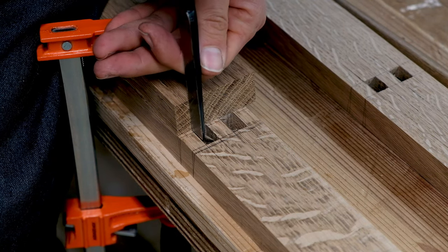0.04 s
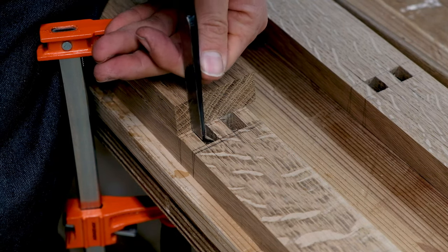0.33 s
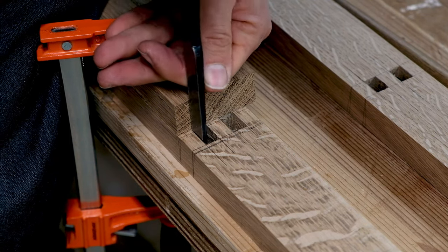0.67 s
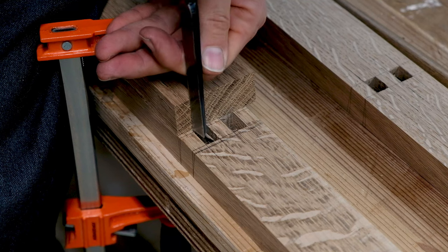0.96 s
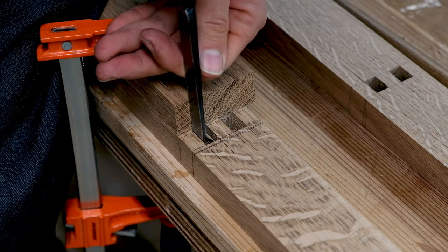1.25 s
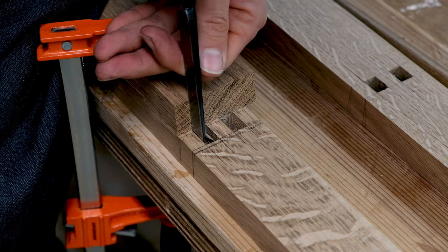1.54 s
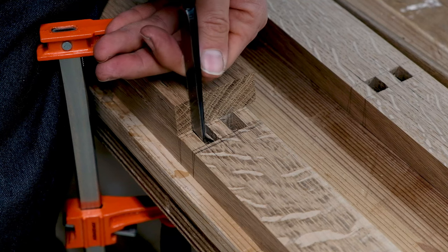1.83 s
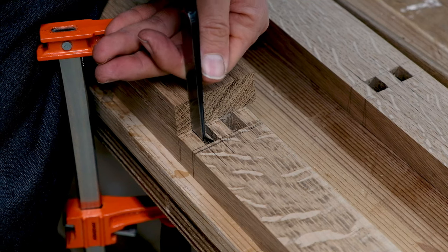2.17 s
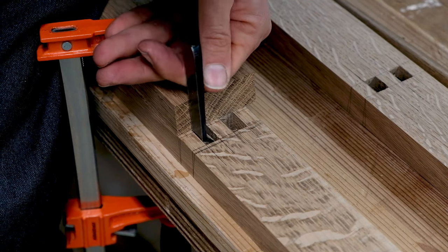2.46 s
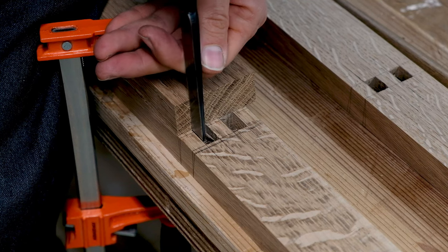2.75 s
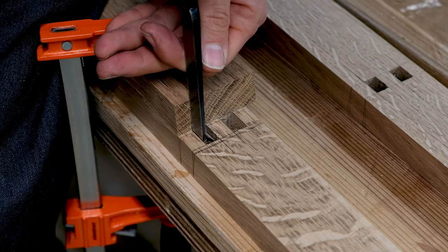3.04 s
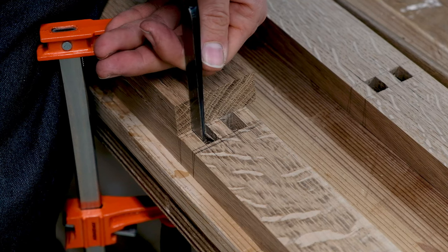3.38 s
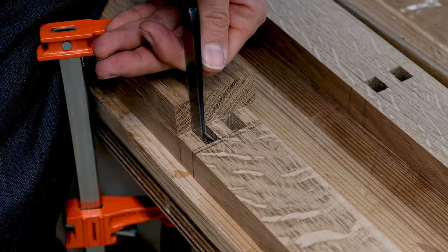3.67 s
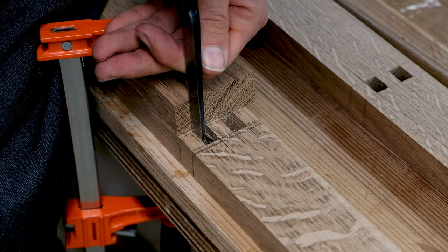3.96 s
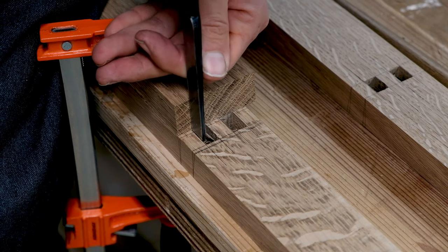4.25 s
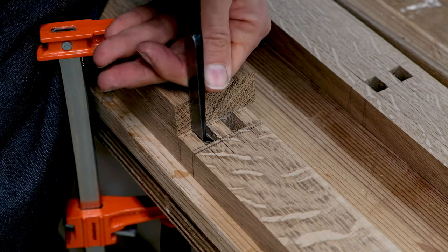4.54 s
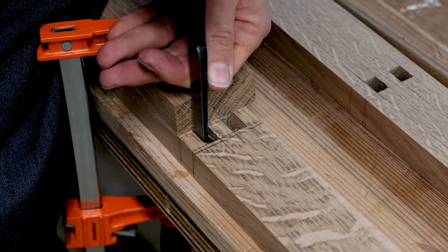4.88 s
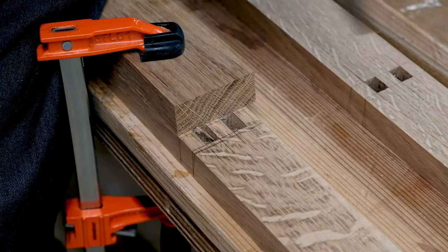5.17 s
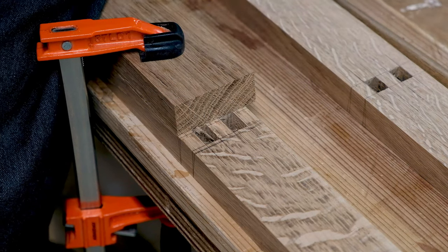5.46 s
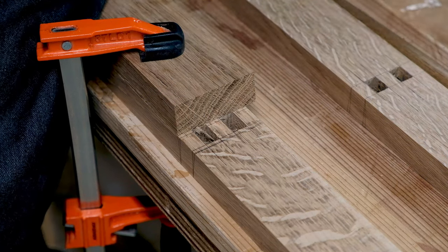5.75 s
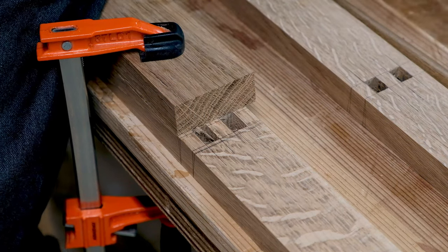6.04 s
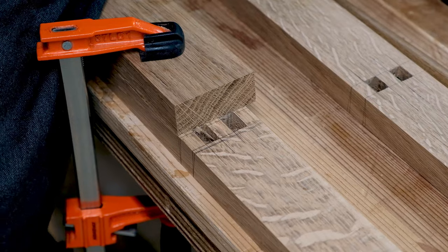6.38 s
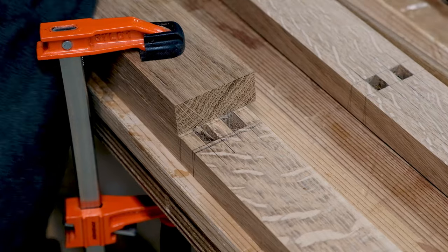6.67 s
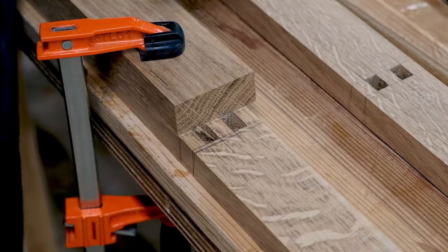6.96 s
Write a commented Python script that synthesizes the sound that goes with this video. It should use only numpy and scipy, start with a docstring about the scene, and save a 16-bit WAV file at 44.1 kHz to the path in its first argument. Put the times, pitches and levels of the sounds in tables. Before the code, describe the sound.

Over the steady low hum of a ventilation fan, a chisel bites into wood with a few tiny, crisp scrapes and snaps. It pauses, cuts again briefly, pauses, then makes a longer run of cuts. After a light tick, the tool clatters down on wood, hollow and slightly metallic, the loudest sound. Faint sleeve rubbing follows. The microphones are close, in a small workshop with short reflections.

```python
"""A hand chisel pares the corner of a joint in a clamped hardwood board, close by in a small workshop.
Each short cut is a burst of snapping fibres that shakes the board; the bench thumps when the edge stops.
Then the chisel is laid down: the blade knocks and rings, the tool rocks, the handle drops.
Hand and sleeve brush the wood, and a ventilation fan and mains hum make the room tone.
Two closely spaced microphones hear the work near the centre, with the room's short reflections."""
import sys
import numpy as np
from scipy import signal
from scipy.fft import rfft, irfft, next_fast_len
from scipy.io import wavfile
from scipy.ndimage import uniform_filter1d, map_coordinates

SR = 44100
rng = np.random.default_rng(int(sys.argv[2]) if len(sys.argv) > 2 else 0)


def inscribe(sig):
    """Save sig as 16-bit PCM at rate SR to the path in sys.argv[1].

    A 1-D sig is mono; a 2-D sig holds one channel per row.
    Samples are clipped to [-1, 1] before scaling.
    """
    pcm = np.round(np.clip(np.atleast_2d(sig).T, -1, 1) * 32767)
    wavfile.write(sys.argv[1], SR, pcm.astype(np.int16))


N = 309141
TIME = np.arange(N) / SR

# pushes of the chisel: (start [s], length [s], crunch [dB], swell over the cut [dB],
# board shake [dB], final break [dB])
CUTS = [(0.162, .016, -53, -9, -44, -45), (0.223, 0.018, -46.5, 2, -41.5, -40.5),
        (0.394, .013, -55, -3, -37, -38), (0.438, 0.055, -44.5, 0, -34, -35.5),
        (0.528, .027, -40, -1, -26, -23), (2.106, 0.016, -40.5, 3.5, -33, -43),
        (2.164, 0.008, -46.5, 0, -47, -37), (2.238, 0.036, -33.5, -5, -25, -28),
        (2.275, .036, -50, -3, -34, -30), (3.910, 0.0093, -47, 0, -42, -48),
        (4.046, .024, -44.5, -7, -33.5, -36.5), (4.157, 0.036, -39.5, 2, -31, -32),
        (4.333, .051, -38, -4.5, -26.5, -33), (4.457, 0.019, -46, 1, -34, -37.5),
        (4.566, 0.028, -37.5, 8, -25, -29), (4.938, .02, -51, 8, -52, -58)]
# spectrum of fibres crunching at the edge: (frequency [Hz], relative level [dB])
CRUNCH_SPECTRUM = [(500, -25), (1200, 1), (2200, 2.5), (3600, 0.5), (5000, -9.5), (7000, -11), (10000, -34),
                   (15000, -47)]
# spectrum of their bright fizz: (frequency [Hz], relative level [dB])
FIZZ_SPECTRUM = [(2500, -47), (5000, -1), (7000, 9.5), (10500, 4), (13000, -9), (16000, -9)]
# resonances of the chisel held in the wood: (frequency [Hz], width [Hz], relative level [dB])
HELD_CHISEL_MODES = [(1430, 40, -0.5), (1985, 73, 6.5), (2730, 160, -10), (2730, 79, 12), (3710, 250, -5.5),
                     (3850, 124, 9), (4930, 170, -0.5), (6220, 310, -2.5)]
# resonances of the clamped board: (frequency [Hz], width [Hz], relative level [dB])
BOARD_MODES = [(232, 36, 1.5), (345, 64, 1), (428, 82, -2), (650, 95, 0.5), (811, 42, -3.5),
               (928, 160, -0.5), (1168, 76, -4), (1597, 290, -15.5)]
# resonances of the bench under it: (frequency [Hz], width [Hz], relative level [dB])
BENCH_MODES = [(95.2, 42, -0.5), (117.5, 54, 1), (175.4, 16.7, -4.5), (243.6, 17, -7.5), (352, 29.5, -2.5),
               (438, 86, -15)]

# the blade strikes the wood as it is laid down: (time [s], knock [dB], ring [dB])
BLADE_HITS = [(5.9625, -13, -27.5), (6.0555, -14.5, -26)]
# the handle drops and bounces: (time [s], knock [dB], thud [dB])
HANDLE_DROPS = [(6.0974, -19.5, -9), (6.116, -21, -14.5)]
# modes of the steel blade: (frequency [Hz], relative level [dB], t60 [s])
BLADE_MODES = [(2810, -1, .1), (3150, -4, 0.095), (3900, -9.5, 0.055), (4730, 3.5, 0.04),
               (5030, -9.5, 0.065), (5440, 2, 0.031), (6148, -7.5, 0.066), (6724, -2, 0.058),
               (8800, -17.5, .07), (10890, -28, .12), (12130, -31, .1)]
# hollow ring of the plank it lands on: (frequency [Hz], width [Hz], relative level [dB])
PLANK_MODES = [(768, 47, 3.5), (805, 25, 5), (852, 19, -1), (1230, 30, -8), (1474, 80, -12.5),
               (1430, 26, -20), (1644, 78, -6.5)]
# spectrum of a knock on the wood: (frequency [Hz], relative level [dB])
KNOCK_SPECTRUM = [(50, -38), (110, -16.5), (300, -19), (480, -7), (620, -6), (790, -3), (1000, -2.5),
                  (1180, -13.5), (1400, -5), (1650, -11.5), (1850, -15), (2150, -11.5), (2700, -18.5),
                  (5000, -32.5), (8000, -44), (14000, -56)]
# spectrum of the dry click of steel on wood: (frequency [Hz], relative level [dB])
CLICK_SPECTRUM = [(800, -6), (2000, 8.5), (4000, 6), (6500, -13), (8000, -32), (14000, -26)]
# light ticks as the chisel is lifted out and as the hand lets go: (time [s], level [dB])
TICKS = [(4.9675, -36), (6.284, -45)]
# hand and sleeve slide over the wood: (middle [s], length [s], level [dB])
SLIDES = [(0.374, 0.67, -52.5), (0.842, .11, -50), (2.61, 0.082, -49), (2.757, 0.11, -51),
          (5.692, 2.5, -55.5), (6.577, 0.21, -51), (6.712, 0.17, -51), (6.97, 0.63, -55)]
# spectrum of that rubbing: (frequency [Hz], relative level [dB])
SLIDE_SPECTRUM = [(200, -34), (700, 5.5), (2000, -0.5), (4500, -9.5), (8000, -23.5), (15000, -36)]

# fan and mains lines: (frequency [Hz], level [dB], waver [dB])
HUM_LINES = [(71.5, -51, 3.5), (102.2, -64.5, -0.5), (147.8, -51, 1.85), (204.6, -64.5, -1.5),
             (299.6, -53, 3), (343.3, -59, 4), (403.4, -55.5, 1.5), (551, -60, 0), (913, -64.5, 11),
             (1116, -93, -8)]
# spectrum of the fan's rush: (frequency [Hz], relative level [dB])
AIR_SPECTRUM = [(15, -16), (30, -2), (55, 2), (120, 2.5), (220, -1.5), (380, 3), (550, -2.5), (900, -0.5),
                (1400, -5.5), (2000, -8), (4000, -20.5), (7000, -31), (10000, -37.5), (15500, -45)]
# diffuse sound at the two microphones: (frequency [Hz], left-right likeness [0-1])
MIC_LIKENESS = [(60, 0.98), (250, 0.83), (700, 0.83), (1300, 0.67), (2500, .55), (5000, 0.31), (10000, 0.1)]
# reverberation of the workshop: (frequency [Hz], t60 [s])
ROOM_T60 = [(100, 0.72), (300, 0.52), (800, 0.43), (2000, 0.48), (5000, 0.31), (12000, 0.057)]

BITE_S, LET_GO_S = 0.0022, 0.0063   # the edge enters; time constant of the last fibres giving way
BOARD_BUILD_S, BOARD_TILT_DB = 0.0047, 2   # the board takes up the load; + tilts its shake to the treble
FIZZ_DB = -17.5   # relative to the crunch
CRACK_DB, JOLT_DB, THUMP_DB = -8, 7.5, 1   # chip, board and bench, relative to the break
CRACK_LEAD_S = 0.0044   # the chip splits off just before the edge stops
ROCK_S, ROCK_SCATTER_S = .0195, .0012   # time between rocking contacts and its spread
ROCK_KNOCK_DB, ROCK_THUD_DB = -22, -33
STEEL_CONTACT_HZ, SOFT_CONTACT_HZ = 2470, 900   # a softer contact is duller


def paring(room, board_lag_s=0.0045, crunch_db=-0.5, chisel_db=-3, crack_fizz_db=-11, pivot_hz=600):
    """Snapping fibres crunch at the edge and shake the board; each cut ends with a crack and a jolt."""
    start, length, *_, break_db = np.transpose(CUTS)
    push, load = pushes()
    fibres = snaps(per_s=6400, spread_db=3.5, slip_db=2.0) * push
    cracks = blows(start + length - CRACK_LEAD_S, break_db + CRACK_DB, span_s=0.0012)
    cutting = fibres + cracks
    edge = (from_db(crunch_db) * through(cutting, colour(CRUNCH_SPECTRUM))
            + from_db(chisel_db) * through(cutting, body(HELD_CHISEL_MODES)))
    fizz = through(from_db(FIZZ_DB) * fibres + from_db(crack_fizz_db) * cracks, colour(FIZZ_SPECTRUM))
    judder = snaps(per_s=4000, spread_db=1, slip_db=-2)
    lows = lowpass(judder, pivot_hz, order=1)
    judder = from_db(-BOARD_TILT_DB) * lows + from_db(BOARD_TILT_DB) * (judder - lows)
    # the heavy board follows the edge a little late
    shake = np.interp(TIME - board_lag_s, TIME, judder * load)
    jolts = blows(start + length + board_lag_s / 2, break_db + JOLT_DB, span_s=0.00038)
    board = through(shake + jolts, body(BOARD_MODES))
    return (at_mics(edge, room, wet_db=-13, pan_db=-4.0, scatter_hz=2000)
            + at_mics(fizz, room, wet_db=-7, pan_db=1.5, scatter_db=-20)
            + at_mics(board, room, wet_db=-4.0, pan_db=-0.5))


def pushes():
    """Strength at the edge and in the board: a push bites, swells or eases, and dies as the chip splits."""
    edge, board = np.zeros((2, N))
    for start, length, crunch_db, swell_db, board_db, _ in CUTS:
        t = np.clip(TIME - start, 0, 1)
        bite = np.minimum(t / BITE_S, 1)
        let_go = np.exp(-np.maximum(t - length + CRACK_LEAD_S, 0) / LET_GO_S)
        swell = from_db(swell_db * (np.minimum(t / length, 1) - .5))
        push = bite * let_go * swell
        edge += from_db(crunch_db) * push
        board += from_db(board_db) * push * (1 - np.exp(-t / BOARD_BUILD_S))
    return edge, board


def snaps(per_s, spread_db, slip_db):
    """Fibres snap at random with uneven sizes, in clumps as the edge sticks and slips."""
    sizes = from_db(spread_db * np.minimum(rng.exponential(1, N), 4)) * rng.choice([-1, 1], N)
    snapping = rng.random(N) < per_s / SR
    return unit_rms(sizes * snapping * from_db(slip_db * drift(per_s=190)))


def bench(room, lag_s=0.0021, handle_db=-17.5):
    """The bench answers the end of each cut, and the dropped handle, with a low thump."""
    start, length, *_, break_db = np.transpose(CUTS)
    drops, _, thud_db = np.transpose(HANDLE_DROPS)
    times = np.r_[start + length, drops] + lag_s
    jolts = blows(times, np.r_[break_db + THUMP_DB, thud_db + handle_db], span_s=0.016)
    return at_mics(through(jolts, body(BENCH_MODES)), room, wet_db=-6.0, pan_db=-1.5)


def laying_down(room, plank_db=1, chatter_s=0.009, click_db=2, contact_s=0.0065):
    """The chisel knocks on the plank: hard contacts click and ring the blade, soft ones thud."""
    hits, hit_db, ring_db = np.transpose(BLADE_HITS)
    rocks = [(time, ROCK_KNOCK_DB, ROCK_THUD_DB) for time in rocking()]
    touches, touch_db, thud_db = np.transpose(rocks + list(HANDLE_DROPS))
    contacts = (lowpass(blows(hits, hit_db, contact_s), STEEL_CONTACT_HZ, order=1)
                + lowpass(blows(touches, touch_db, contact_s), SOFT_CONTACT_HZ, order=2))
    knock = through(contacts, colour(KNOCK_SPECTRUM))
    hollow = from_db(plank_db) * through(contacts, body(PLANK_MODES))
    t = TIME[:SR // 2]
    # the handle chatters for a moment each time its weight comes down
    chatter = through(blows(touches, thud_db, span_s=0.0026), noise_burst(t, chatter_s))
    thud = through(chatter, body(BOARD_MODES))
    # the blade's own contacts are short and heard from close by
    ring = sum(from_db(db - 60 * t / t60) * np.sin(2 * np.pi * hz * t) for hz, db, t60 in BLADE_MODES)
    taps = blows(hits, ring_db, span_s=0.00095)
    blade = through(taps, unit_energy(ring)) + from_db(click_db) * through(taps, colour(CLICK_SPECTRUM))
    return (at_mics(knock, room, wet_db=1, pan_db=-1.1, scatter_db=-12)
            + at_mics(hollow, room, wet_db=-0.5, pan_db=-1.0)
            + at_mics(thud, room, wet_db=-5.5, pan_db=-0.5)
            + at_mics(blade, room, wet_db=-9, pan_db=2.0, scatter_db=-8))


def rocking():
    """Times of the soft contacts after each blade hit, until the next hit or the drop of the handle."""
    landings = [row[0] for row in BLADE_HITS] + [HANDLE_DROPS[0][0]]
    times = np.concatenate([np.arange(hit + ROCK_S, after - ROCK_S / 2, ROCK_S)
                            for hit, after in zip(landings, landings[1:])])
    return times + ROCK_SCATTER_S * rng.standard_normal(len(times))


def ticks(room, plank_db=-2, steel_db=-1, click_db=-5, skid_s=0.0036):
    """A light touch skids for an instant and rings in the chisel and the plank."""
    skid = noise_burst(TIME[:SR // 10], skid_s)
    taps = through(blows(*np.transpose(TICKS), span_s=0.0018), skid)
    click = from_db(click_db) * through(taps, colour(CRUNCH_SPECTRUM))
    steel = from_db(steel_db) * through(taps, body(HELD_CHISEL_MODES))
    plank = from_db(plank_db) * through(taps, body(PLANK_MODES))
    return at_mics(click + steel + plank, room, wet_db=-11, pan_db=0.0)


def rubbing(grain_db=1.0):
    """Skin and cloth slide softly over the grain; each slide swells and fades."""
    speed = sum(from_db(db) * np.cos(np.pi * np.clip((TIME - middle) / length, -.5, .5))
                for middle, length, db in SLIDES)
    friction = diffuse(N) * speed * from_db(grain_db * drift(per_s=71))
    return through(friction, colour(SLIDE_SPECTRUM))


def ventilation(air_db=-45, pan_db=-1.6):
    """Room tone, a little to the right: rushing air with wavering fan and mains lines."""
    air = from_db(air_db) * through(diffuse(N), colour(AIR_SPECTRUM))
    hum = 0
    for hz, level_db, waver_db in HUM_LINES:
        phase = 2 * np.pi * (hz * TIME + rng.random()) + 0.18 * waver_db * drift(per_s=5)
        waver = unit_rms(from_db(waver_db * drift(per_s=7)))
        hum = hum + np.sqrt(2) * np.sin(phase) * from_db(level_db) * waver
    return panned(air + hum, pan_db)


def workshop(build_s=0.0048, smooth_hz=15):
    """The room at the two microphones: reflections build up, then die away, the treble first."""
    t, hz = TIME[:SR], np.fft.rfftfreq(SR, 1 / SR)
    noise, centres = rfft(diffuse(SR)), np.log([row[0] for row in ROOM_T60])
    tail = 0
    for share, (_, t60) in zip(np.eye(len(centres)), ROOM_T60):
        band = irfft(noise * np.interp(np.log(hz + 1), centres, share), SR)
        tail = tail + band * unit_energy(from_db(-60 * t / t60) * (1 - np.exp(-t / build_s)))
    # smooth the random tail's spectrum so the reverberation adds no stray ringing pitches
    spectrum = rfft(tail)
    power = uniform_filter1d(np.mean(np.abs(spectrum) ** 2, axis=0), smooth_hz)
    return irfft(spectrum / np.sqrt(power), SR)[:, :SR // 2]


def at_mics(x, room, wet_db, pan_db, scatter_db=-4, scatter_hz=3500):
    """Three paths to the microphones: direct, treble scattered by the bench top, and off the room."""
    t = TIME[:room.shape[1]]
    scatter = signal.lfilter(*signal.butter(2, scatter_hz, "high", fs=SR), noise_burst(t, 0.00058))
    paths = (t == 0) + from_db(scatter_db) * scatter * [[1], [-1]] + from_db(wet_db) * room
    return panned(through(x, paths), pan_db)


def diffuse(size):
    """White noise from all round: alike at both microphones in the bass, unrelated in the treble."""
    padded = next_fast_len(size)
    mid, side = rfft(rng.standard_normal((2, padded)))
    alike = np.clip(at_hz(MIC_LIKENESS, np.fft.rfftfreq(padded, 1 / SR)), 0, 1)
    pair = np.sqrt((1 + alike) / 2) * mid + np.sqrt((1 - alike) / 2) * side * [[1], [-1]]
    return irfft(pair, padded)[:, :size]


def blows(times, levels_db, span_s):
    """Clicks that carry the energy of the given levels held for span_s."""
    clicks = np.zeros(N)
    clicks[np.round(np.array(times) * SR).astype(int)] = from_db(levels_db) * np.sqrt(span_s * SR)
    return clicks


def body(modes, reach=2.6):
    """Impulse response of damped resonances in parallel; little passes far above the highest one."""
    t = TIME[:SR // 4]
    ringing = sum((-1) ** k * from_db(db) * width * np.exp(-np.pi * width * t)
                  * np.sin(2 * np.pi * hz * t) for k, (hz, width, db) in enumerate(modes))
    top_hz = min(reach * modes[-1][0], SR / 4)
    return unit_energy(lowpass(ringing, top_hz, order=2))


def colour(spectrum, size=4096):
    """The shortest causal impulse response with this spectral shape."""
    cepstrum = irfft(np.log(from_db(at_hz(spectrum, np.fft.rfftfreq(size, 1 / SR)))))
    cepstrum[1:size // 2] *= 2
    cepstrum[size // 2 + 1:] = 0
    return unit_energy(irfft(np.exp(rfft(cepstrum))))


def noise_burst(t, decay_s):
    """Decaying noise of unit energy."""
    return unit_energy(rng.standard_normal(len(t)) * np.exp(-t / decay_s))


def drift(per_s):
    """A smooth random wander of rms 1."""
    knots = rng.standard_normal(int(N / SR * per_s) + 3)
    curve = map_coordinates(knots, [TIME[::32] * per_s], order=3, mode="nearest")
    return unit_rms(curve).repeat(32)[:N]


def through(x, response):
    """Pass a sound through an impulse response, mono or stereo."""
    return signal.fftconvolve(np.atleast_2d(x), np.atleast_2d(response))[:, :N]


def lowpass(x, hz, order):
    """Roll off the treble."""
    return signal.lfilter(*signal.butter(order, hz, fs=SR), x)


def panned(x, pan_db):
    """Favour the left microphone over the right by pan_db."""
    return x * from_db([[pan_db / 2], [-pan_db / 2]])


def at_hz(points, hz):
    """Read a table on a log-frequency axis."""
    points = np.array(points)
    return np.interp(np.log(np.maximum(hz, 1)), np.log(points[:, 0]), points[:, 1])


def from_db(db):
    """Decibels to gain."""
    return 10 ** (np.asarray(db) / 20)


def unit_rms(x):
    """Scale to rms 1."""
    return x / np.sqrt(np.mean(x ** 2) + 1e-20)


def unit_energy(response):
    """Scale a response so that it passes white noise at the same level."""
    return response / np.sqrt(np.sum(response ** 2))


def scene():
    """At the bench in a small workshop: the chisel close by, the fan behind it all."""
    room = workshop()
    return paring(room) + bench(room) + laying_down(room) + ticks(room) + rubbing() + ventilation()


def record(dry):
    """Two closely spaced microphones, the left reached later; peaks clip and the top is cut steeply."""
    left_late_s, ceiling, cutoff_hz = 2.7e-5, 0.92, 15600
    delay = np.exp(-2j * np.pi * np.fft.rfftfreq(N, 1 / SR) * left_late_s)
    left = irfft(rfft(dry[0]) * delay, N)
    clipped = np.clip([left, dry[1]], -ceiling, ceiling)
    return signal.sosfilt(signal.ellip(10, .1, 80, cutoff_hz, fs=SR, output="sos"), clipped)


dry = scene()
out = record(dry)
inscribe(out)
```